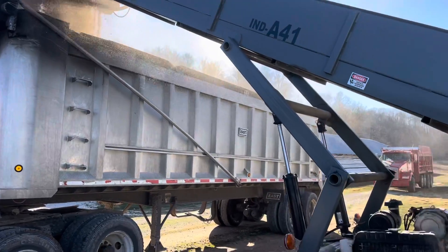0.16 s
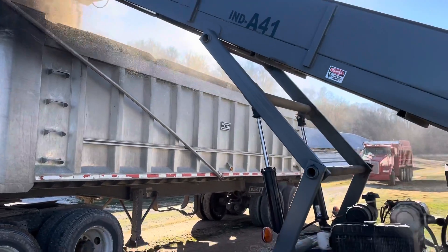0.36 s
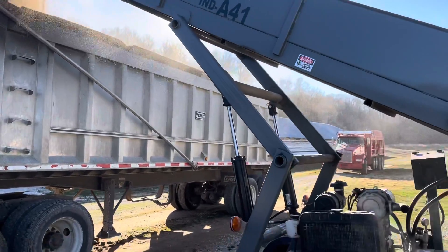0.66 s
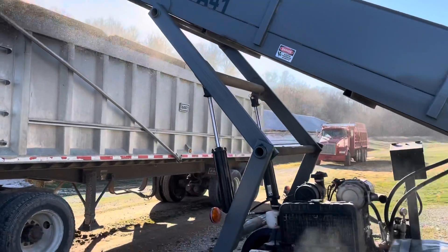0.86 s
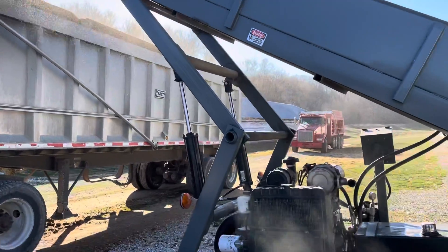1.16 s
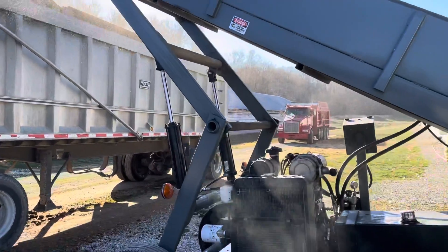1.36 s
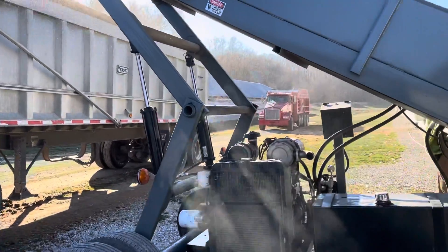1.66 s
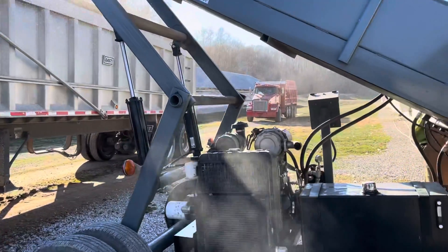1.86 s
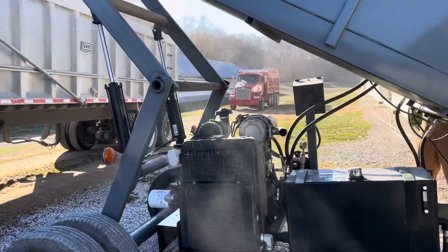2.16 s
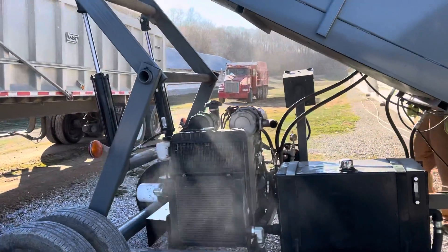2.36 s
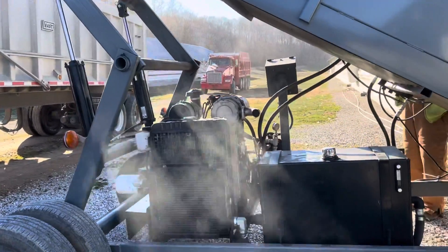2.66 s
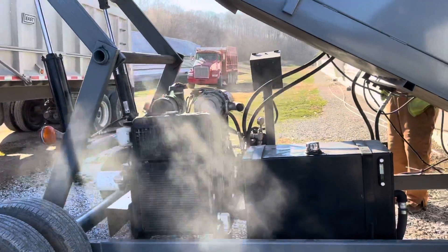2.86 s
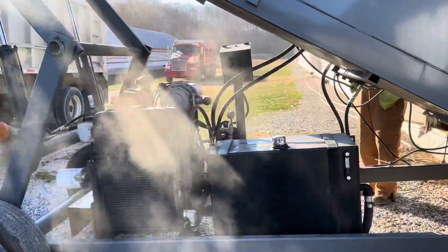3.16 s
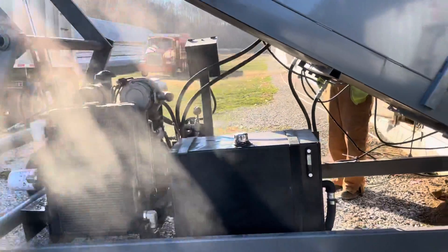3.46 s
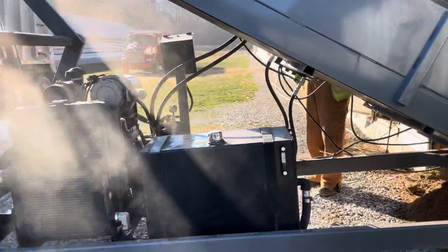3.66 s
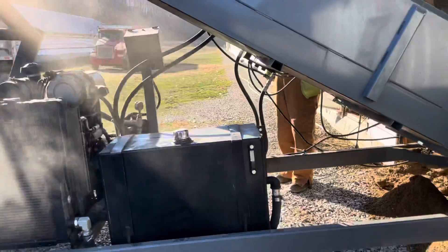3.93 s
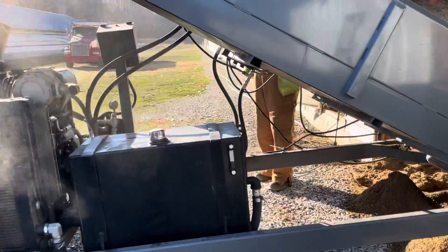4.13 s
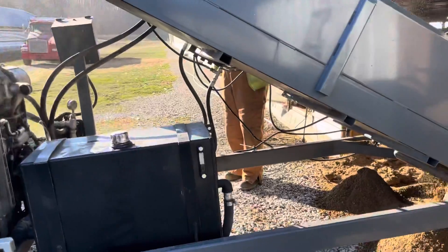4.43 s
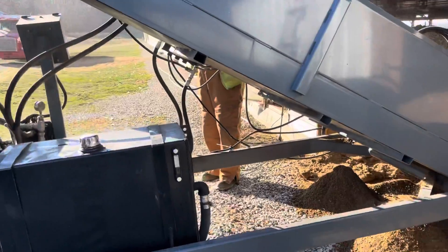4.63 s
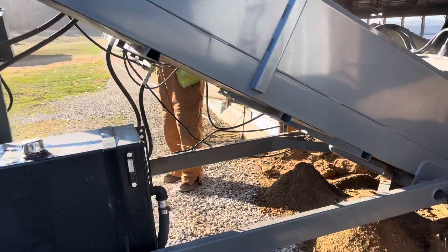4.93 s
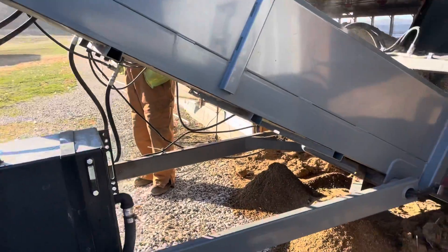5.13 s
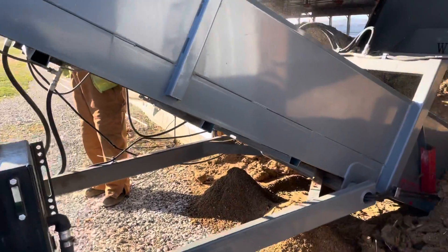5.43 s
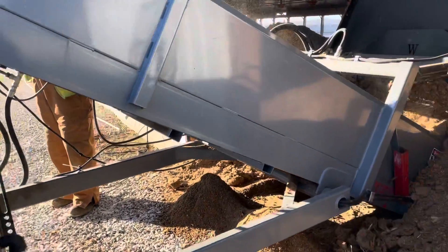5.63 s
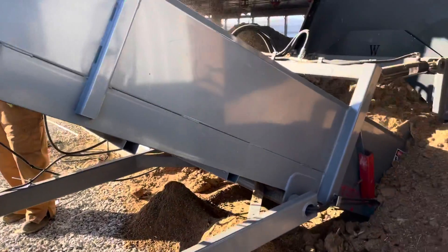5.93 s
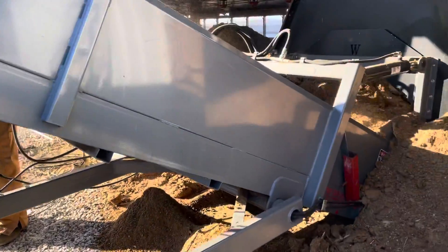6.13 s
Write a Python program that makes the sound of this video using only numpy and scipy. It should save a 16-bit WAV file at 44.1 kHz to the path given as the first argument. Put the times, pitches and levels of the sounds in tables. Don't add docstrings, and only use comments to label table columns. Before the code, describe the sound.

From 0 seconds a four-cylinder diesel is already running, and it holds one speed to the end at about 6.3 seconds. Its low exhaust throb pulses about fifty times a second beneath a broad roar of fan, pump and belt, with faint whirring tones, uneven combustion knocks and ticking valves and injectors. A conveyor chain clatters over a sprocket about eleven times a second, with dull metallic impacts and irregular brighter clanks; soil hisses faintly and grittily. Between 1 and 3 seconds engine and conveyor come nearer, with harder links around 2.9. From 3.3 to 4.8 the handheld stereo microphone turns, the roar fuller and the knocking changed in colour. After 4.8 the conveyor body shades the engine, dulling parts of its midrange; the chain recedes near 5.4, then comes closest, with a strong clank at 6.0. The place is open and dry, without evident echo.

```python
import sys
import numpy as np
from scipy import signal
from scipy.fft import rfft, irfft, next_fast_len
from scipy.io import wavfile

SR = 44100
rng = np.random.default_rng(int(sys.argv[2]) if len(sys.argv) > 2 else 0)


def invert_db(x):
    u = np.asarray(x, float) / 20
    return 10 ** u


def inscribe(sig):
    pcm = np.round(np.clip(np.atleast_2d(sig).T, -1, 1) * 32767)
    wavfile.write(sys.argv[1], SR, pcm.astype(np.int16))


N = 277389
TIME_S = np.arange(N) / SR
CYCLE_HZ = 12.585
PADDED = next_fast_len(N, True)
GRID_HZ = np.maximum(np.fft.rfftfreq(PADDED, 1 / SR), 1)


def rms_one(x):
    return x / np.sqrt(np.mean(x ** 2) + 1e-20)


def in_time(rows):
    s, *columns = np.transpose(rows)
    return [np.interp(TIME_S, s, c) for c in columns]


def at_hz(points, column=1):
    points = np.array(points)
    log_hz = np.log(np.maximum(points[:, 0], 20))
    return np.interp(np.log(GRID_HZ), log_hz, points[:, column])


def through(x, response):
    return irfft(rfft(x, PADDED) * response, PADDED)[..., :N]


def drift(rate_hz):
    r = np.exp(-2 * np.pi * rate_hz / SR)
    slow = signal.lfilter([1], [1, -2 * r, r * r], rng.standard_normal(N + SR))
    return rms_one(slow[SR:])


def bursts(times, gains, rise_s, fall_s):
    marks = np.zeros(N)
    at = np.clip((np.asarray(times) * SR).astype(int), 0, N - 1)
    np.add.at(marks, at, gains)
    up, down = np.exp(-1 / (rise_s * SR)), np.exp(-1 / (fall_s * SR))
    return signal.lfilter([1 - up], np.convolve([1, -up], [1, -down]), marks + 1e-18)


def pair():
    return rng.standard_normal((2, N))


def exhaust(near_db, turned, shaded):
    # (order [firing rates], rms level [dB], slope [dB per dB nearness], gain by turn [dB], gain by shade [dB])
    orders = [(1, -17.5, 1, 0.5, -1.3), (2, -19.5, 0.94, -3.5, -7), (3, -27, 1.6, -0.5, 1.4),
              (4.5, -28, 7.5, -.5, 1.5)]
    firing_phase = 2 * np.pi * 4 * CYCLE_HZ * TIME_S
    out = 0
    for order, level_db, follows, turn_db, shade_db in orders:
        db = level_db + follows * near_db + turn_db * turned + shade_db * shaded
        db = db + 0.22 * order * drift(2.7)
        phase = order * (firing_phase + 4.05) - 2.15 * order ** 2
        phase = phase + 0.087 * order * drift(11.4)
        out = out + np.sqrt(2) * invert_db(db) * np.cos(phase)
    return out


def roar():
    # (frequency [Hz], spectral level [dB per Hz])
    spectrum = [(28, -12), (45, 1), (80, 6), (130, 1.5), (250, 1), (400, -0.5), (700, -2.5), (1050, -5),
                (1250, -11), (1500, -6.5), (2200, -10.5), (2800, -12.5), (3400, -20), (5000, -26),
                (8000, -37)]
    return rms_one(through(pair() * invert_db(0.45 * drift(17.0)), invert_db(at_hz(spectrum))))


def tones(turned):
    # (frequency [Hz], rms level [dB], gain by turn [dB])
    lines = [(252, -36, 3), (352, -36, 3.5), (478, -44.5, 9.5), (453, -37.5, 3.5), (705, -32, -1.5),
             (755, -47, 8), (886, -40.5, -1), (953, -38, -1), (1110, -43.5, 13), (1148, -50, -7),
             (1448, -39, -8), (1570, -49, 5), (1615, -45, 6.5), (1668, -40, -10), (3145, -43, -3)]
    out = np.zeros((2, N))
    sways = [drift(1.2) for k in range(5)]
    for k, (hz, db, turn_db) in enumerate(lines):
        locked_hz = np.round(hz / CYCLE_HZ) * CYCLE_HZ
        level = invert_db(db + turn_db * turned + 2.0 + 1.33 * sways[k % 5])
        turns = locked_hz * TIME_S + rng.random((2, 1))
        out += level * np.cos(2 * np.pi * turns + .5 * sways[k % 4])
    return out


def firing_gate(rise_s, fall_s, spread_db):
    # (time into the cycle [s], knock level [dB])
    firings = [
        (.0165, 0),
        (.030, -1),
        (0.05, 4),
        (0.071, 4),
    ]
    into, db = np.transpose(firings)
    times = (np.arange(80)[:, None] / CYCLE_HZ + into).ravel()
    gains = invert_db(db + spread_db * rng.standard_normal((80, 4))).ravel()
    keep = times < N / SR
    return bursts(times[keep], gains[keep], rise_s, fall_s)


def hiss():
    # (frequency [Hz], spectral level [dB per Hz])
    spectrum = [(1500, -26), (3200, -5), (4300, 2.5), (5300, -4), (5800, -7.5), (7500, -4), (9000, -1.5),
                (11000, -8.5), (13000, -8), (13600, -28)]
    grit = 1 + 1.05 * (rng.random(N) < 900 / SR) * rng.exponential(1, N)
    swell = invert_db(1.35 * drift(3.8) + 0.79 * drift(37))
    swell = swell * (1 + .3 * firing_gate(0.0012, 0.0077, spread_db=2.0))
    return rms_one(through(pair() * grit * swell, invert_db(at_hz(spectrum))))


def valve_gear(turned):
    # (time into the cycle [s], frequency [Hz], bandwidth [Hz], level before turn [dB], level after turn [dB])
    blows = [(.048, 1502, 210, -14, -20), (.069, 1123, 99, -29, -16.5), (.036, 1114, 120, -33, -21),
             (0.03, 1458, 175, -18.5, -19.5), (0.063, 1415, 140, -15.5, -20),
             (0.00061, 1416, 180, -19.5, -27), (.029, 2590, 173, -23.5, -24.5),
             (.0695, 2470, 700, -19, -27.5), (.049, 2230, 270, -22.5, -16.5),
             (0.034, 1960, 310, -24.5, -21), (.0705, 2050, 450, -28, -16), (.009, 2270, 510, -26, -16),
             (.029, 1880, 450, -26, -15.5), (.068, 630, 145, -16, -21), (.046, 750, 350, -20.5, -13.5),
             (.012, 676, 145, -17.5, -21), (.056, 486, 66, -30, -16)]
    cycles, out = np.arange(79) / CYCLE_HZ, np.zeros((2, N + 2000))
    for into, hz, width, before_db, after_db in blows:
        chance = rng.standard_normal((79, 3))
        at = ((cycles + into + .00005 * chance[:, 0]) * SR).astype(int)
        db = before_db + (after_db - before_db) * turned[np.minimum(at, N - 1)]
        clicks = np.full(out.shape, 1e-18)
        clicks[0, at] = invert_db(db + 2.0 * chance[:, 1])
        clicks[1, at + rng.integers(20, 120)] = invert_db(db + 1.8 * chance[:, 2])
        r, w = np.exp(-np.pi * width / SR), 2 * np.pi * hz / SR
        poles = [1, -2 * r * np.cos(w), r * r]
        swell = signal.lfilter([1 - r, 0, r - 1], poles, clicks)
        out += signal.lfilter([0, np.sin(w)], poles, swell)
    return 1.79 * out[:, :N]


def knock(repeat=.8):
    # (frequency [Hz], bandwidth [Hz], level [dB])
    modes = [(484, 100, -2), (695, 96, -2), (1128, 43, 2.5), (1394, 92, -2), (1670, 100, -4),
             (2100, 81, -4.5), (2517, 67, -4.5)]
    position = (np.arange(N) * CYCLE_HZ / SR % 1 * 3504).astype(int)
    same = rng.standard_normal((2, 3504))[:, position]
    shake = (repeat * same + (1 - repeat) * pair()) * firing_gate(0.0032, 0.0043, spread_db=0.3)
    out = 0
    for k, (hz, width, db) in enumerate(modes):
        r = np.exp(-np.pi * width / SR)
        poles = [1, -2 * r * np.cos(2 * np.pi * hz / SR), r * r]
        mode = signal.lfilter([1, 0, -1], poles, shake)
        out = out + (-1) ** k * invert_db(db) * (1 - r * r) * mode / np.sqrt(width)
    return rms_one(out)


def landings(near_db):
    # (time [s], peak level [dB], brightness [dB])
    hard_links = [(0.0694, -24.5, -12), (0.1594, -21.5, -11.5), (0.2494, -23.5, -8), (0.7106, -30.5, -2.5),
                  (0.882, -23.5, -8), (1.063, -25.5, -8), (1.3286, -23.5, -5.5), (1.6067, -26, -8),
                  (1.9709, -20, -16), (2.07, -21, -11), (2.1735, -20, -13), (2.2553, -20, -9),
                  (2.436, -18.5, -17), (2.5194, -25, -7.5), (2.896, -17.5, -6), (2.984, -16.5, -8),
                  (3.2594, -23, -7.5), (3.714, -25, -6), (3.805, -16.5, -8.5), (3.898, -16.5, -9),
                  (4.349, -23, -12), (4.4433, -18, -9.5), (4.5264, -18, -13), (4.808, -20, -14),
                  (5.1781, -20.5, -12), (5.254, -22.5, -10), (5.4326, -20, -17), (5.536, -20, -11.5),
                  (5.995, -14.5, -9.5), (6.168, -21, -14)]
    first_s, step_s, jitter_s = .0694, .0912, .006
    link_db, follows, spread_db = -23.5, 2.1, 2.3
    bright_db, bright_spread_db = -16, 2.5
    due = np.arange(first_s, N / SR - .02, step_s)
    chance = np.clip(rng.standard_normal((len(due), 3)), -1.3, 1.3)
    times = due + jitter_s * chance[:, 0]
    db = link_db + follows * near_db[(due * SR).astype(int)] + spread_db * chance[:, 1]
    rows = np.transpose([times, db, bright_db + bright_spread_db * chance[:, 2]])
    hard = np.array(hard_links)
    soft = np.abs(due[:, None] - hard[:, 0]).min(axis=1) > step_s / 2
    return np.vstack([rows[soft], hard]).T


def chain(near_db):
    # (frequency [Hz], spectral level [dB per Hz])
    spectrum = [(800, -6), (2500, -3), (3400, -5.5), (4400, -1), (5300, -2), (6000, -9.5), (9000, 5),
                (12000, -2.5), (14000, -0.5), (16000, -23)]
    s, db, bright_db = landings(near_db)
    rattle = through(pair() * invert_db(2.3 * drift(220)), invert_db(at_hz(spectrum)))
    above_body = 1 / (1 + (6500 / GRID_HZ) ** 8)
    above_bright = 1 / (1 + (14000 / GRID_HZ) ** 60)
    body = rms_one(through(rattle, 1 - above_body))
    body = body * bursts(s, invert_db(db - 6.0), 0.0017, 0.031)
    bright = rms_one(through(rattle, above_body * (1 - above_bright)))
    bright = bright * bursts(s, invert_db(db + bright_db + 4.5), 0.0043, 0.014)
    crack = rms_one(through(rattle, above_bright))
    crack = crack * bursts(s, invert_db(1.5 * (db + bright_db) + 7), 0.0042, 0.004)
    return body + bright + crack


def ports(common, scattered, pose):
    # (frequency [Hz], phase lead of left [rad])
    lead = [
        [(60, 0), (690, .6), (950, .9), (1380, 3.1), (1750, 5.2), (2200, 6.5), (3000, 7.4), (3700, 6.9), (5200, 7.1), (5800, 4.8), (6300, 5.3), (7650, 3.14), (9500, 3.14), (12400, 0)],
        [(60, 0), (600, 1.5), (1210, 2.9), (1650, 4.6), (2070, 6.3), (2930, 8.2), (3400, 7.4), (3880, 6.8), (5200, 7.2), (5800, 4.6), (6300, 5.2), (7650, 3.14), (9500, 3.14), (12400, 0)],
    ]
    # (frequency [Hz], left-right level [dB])
    lean = [
        [(60, 0), (350, -.5), (450, 1.5), (1000, 3.5), (1400, 3.5), (2000, .3), (2700, 2.5), (5000, 4.5), (5600, 1), (7000, 2.5), (7650, 0)],
        [(60, -.3), (350, -.3), (700, 4.2), (1100, 3.3), (2300, -1.2), (3000, 2.5), (5000, 4.3), (5600, 1), (7000, 2.5), (7650, 0)],
    ]
    # (frequency [Hz], share before
    coherence = [(60, 0.92, 0.64), (178, 0.95, 1), (450, 0.6, 1), (670, 0.72, 0.69), (1300, 0.15, 0.69),
                 (2120, 0.69, 0.85), (2890, 0.65, 0.67), (3250, 0.56, 0.2), (4180, .7, 0.71),
                 (5650, 0.63, .3), (6550, 0.22, 0.97),
                 (7500, .75, .75), (7900, .91, .91), (8300, .97, .97), (8500, .992, .992),
                     (9100, .992, .992), (9550, .965, .965), (9750, .7, .7), (11000, .6, .6),
                     (12200, .62, .62), (12500, .96, .96), (13300, .995, .995)]
    # (frequency [Hz], gain after the turn [dB])
    turn_colour = [(200, -2), (500, -1), (900, 2), (1300, 2), (1900, -0.5), (2600, -0.5), (4000, 3),
                   (9000, 2.5)]
    alike = np.clip(at_hz(coherence, column=1 + pose), 0, 1)
    half = invert_db(at_hz(lean[pose]) / 2)
    colour = invert_db(pose * at_hz(turn_colour))
    lag = colour * np.exp(-1j * at_hz(lead[pose])) / half
    right = through(common, alike * lag) + through(scattered, np.sqrt(1 - alike ** 2) * lag)
    return np.array([through(common, colour * half), right])


def scene():
    # (time [s], nearness to engine [dB], nearness to conveyor [dB])
    nearness = [
        (0, -2, -2),
        (1.0, -1.5, -2.5),
        (1.9, -.5, -1),
        (2.8, -0.24, 0.6),
        (3.9, -.1, 0.2),
        (4.8, -0.2, -0.3),
        (5.4, -.8, -2.4),
        (6.29, -0.5, 2),
    ]
    # (frequency [Hz], level change [dB])
    shade = [(150, 0), (350, 1), (600, -3), (800, -1), (1150, -7), (1450, 1), (1700, 1.5), (2300, -1),
             (3500, -3)]
    engine_db, conveyor_db = in_time(nearness)
    turned = np.interp(TIME_S, (3.28, 4.8), [0, 1])
    shaded = np.interp(TIME_S, (4.8, 5.76), [0, 1])
    roar_db = -21 + 0.62 * engine_db + 2.5 * turned - 0.74 * shaded
    engine = invert_db(roar_db) * (roar() + invert_db(-9.0) * knock()) + valve_gear(turned) + tones(turned)
    top = invert_db(-5.0 * np.clip((GRID_HZ - 13600) / 1000, 0, 3))
    steady = engine + invert_db(-33.5 + conveyor_db) * hiss()
    steady = (1 - shaded) * through(steady, top) + shaded * through(steady, top * invert_db(at_hz(shade)))
    machine = steady + chain(conveyor_db)
    heard = (1 - turned) * ports(*machine, pose=0) + turned * ports(*machine, pose=1)
    heard = heard * invert_db(-1 * shaded * [[.5], [-.5]])
    return heard + exhaust(engine_db, turned, shaded) * invert_db([[-.15], [.15]])


def top_cut(x):
    return signal.sosfilt(signal.butter(12, 15700, fs=SR, output="sos"), x)


def record(dry):
    rounded = 4 * np.tanh(dry / 4)
    return top_cut(rounded)


dry = scene()
out = record(dry)
inscribe(out)
```